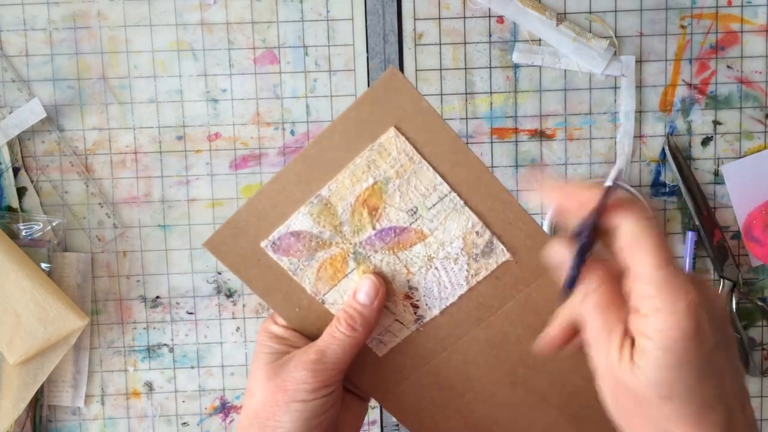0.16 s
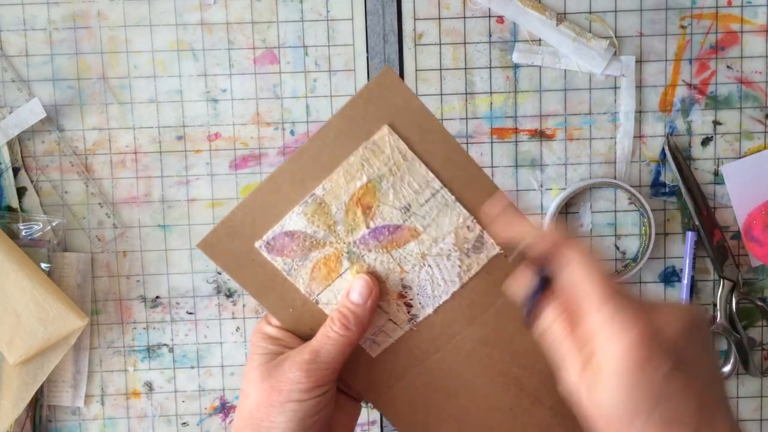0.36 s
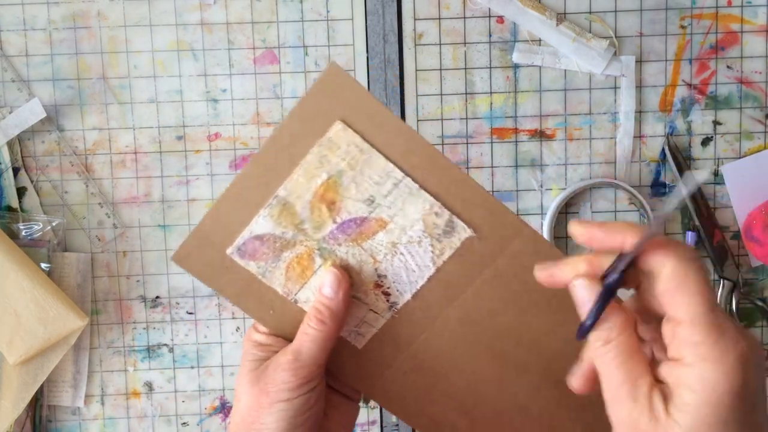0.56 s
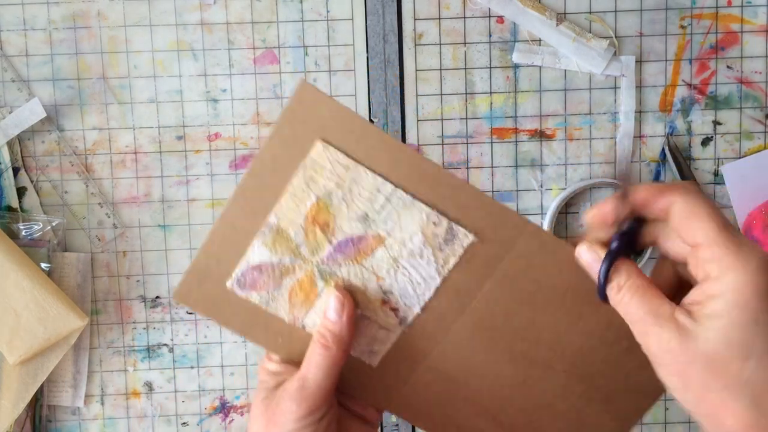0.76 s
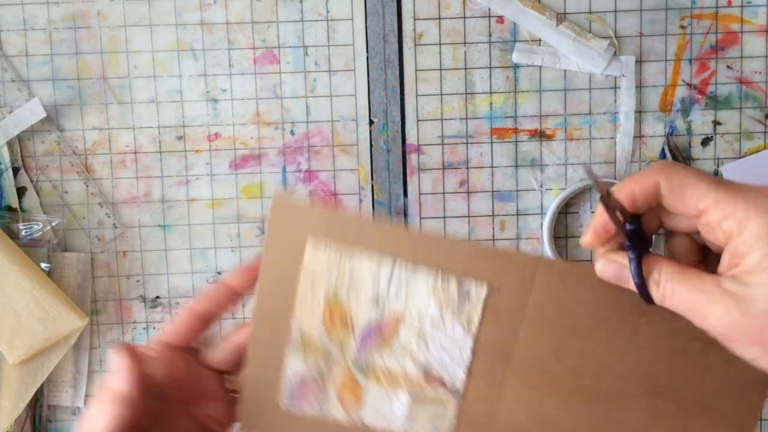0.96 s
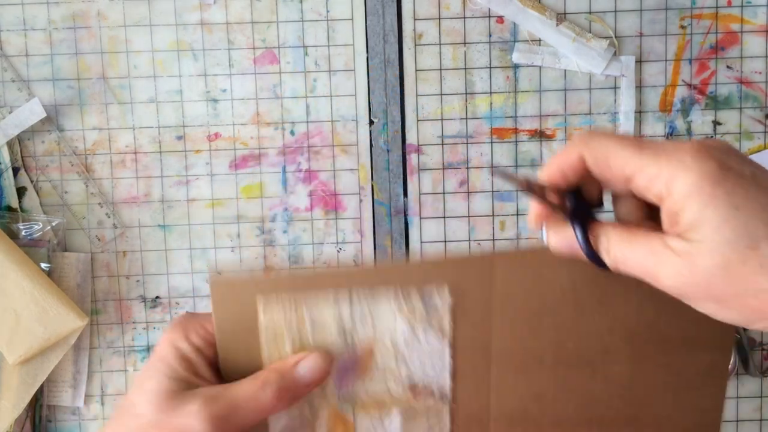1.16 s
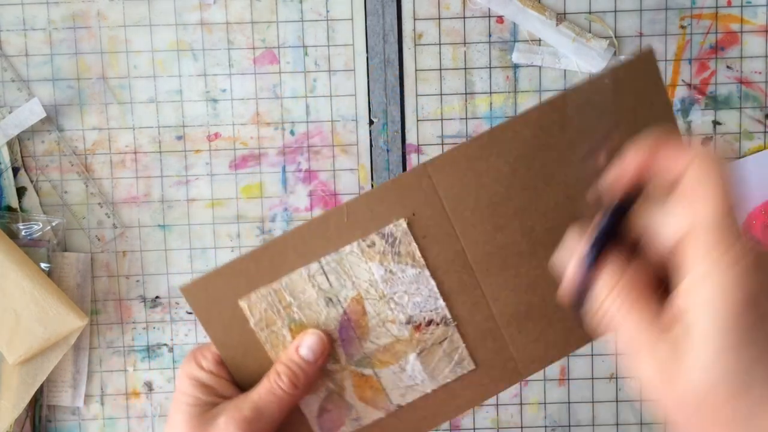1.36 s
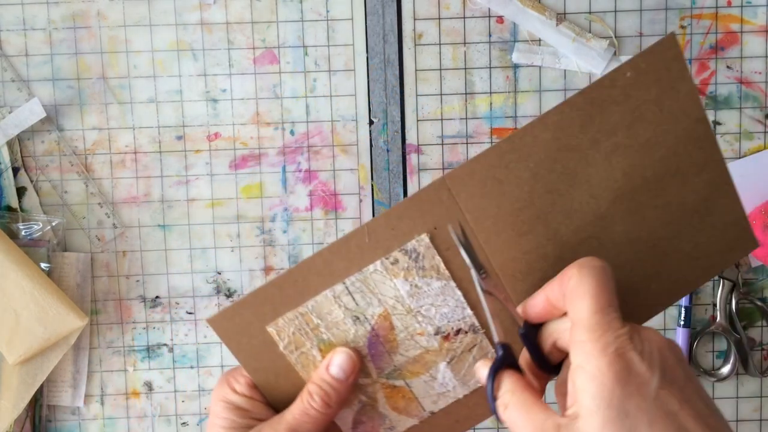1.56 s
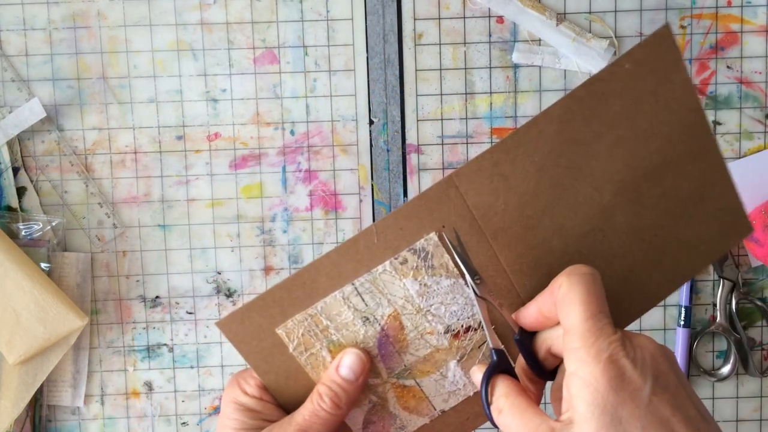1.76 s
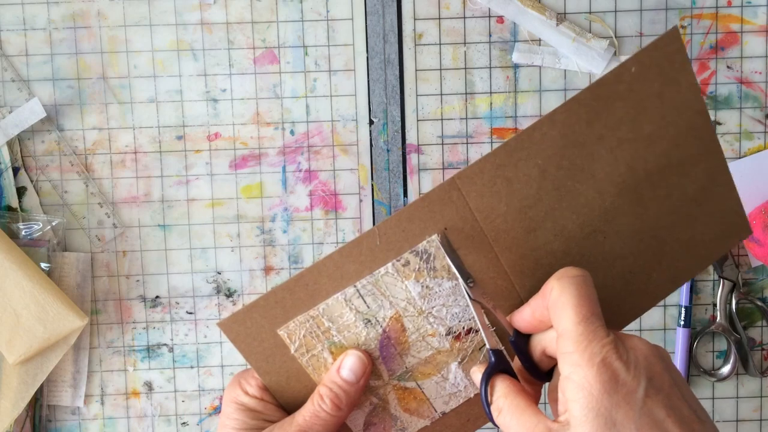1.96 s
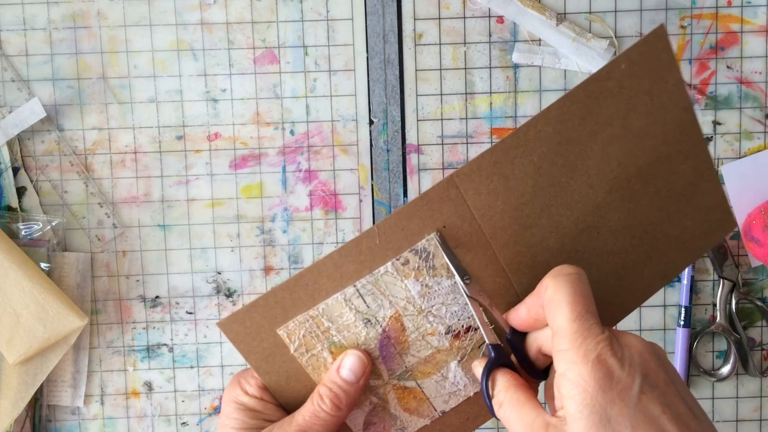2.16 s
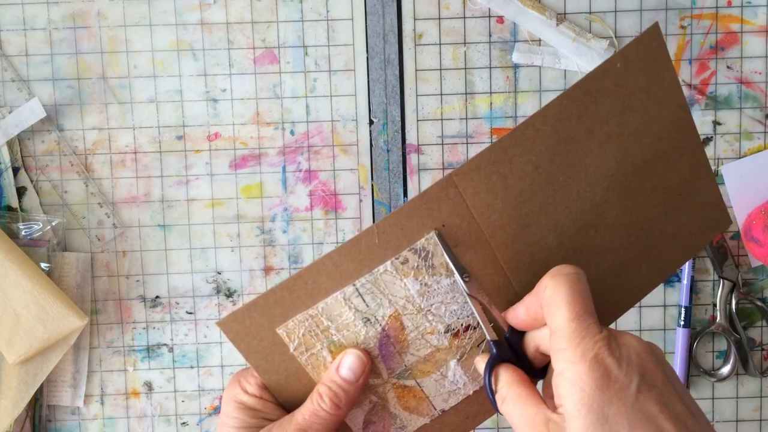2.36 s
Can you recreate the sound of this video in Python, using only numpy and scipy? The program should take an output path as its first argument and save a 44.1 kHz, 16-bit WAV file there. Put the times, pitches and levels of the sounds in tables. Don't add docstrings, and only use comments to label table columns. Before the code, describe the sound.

Two sharp scissor snips in the air, a papery card slide, a click on card, faint fabric nips

```python
import sys
import numpy as np
from scipy import signal
from scipy.fft import rfft, irfft
from scipy.io import wavfile
from scipy.ndimage import uniform_filter1d

SR = 44100
rng = np.random.default_rng(int(sys.argv[2]) if len(sys.argv) > 2 else 0)


def int16_out(signal):
    q = np.round(np.clip(np.atleast_2d(signal).T, -1, 1) * 32767)
    wavfile.write(sys.argv[1], SR, q.astype(np.int16))


def makeup_ratio(level_db):
    decades = np.asarray(level_db, float) / 20
    return 10 ** decades


N = 105840

# [s, dB, Hz, s]
STEEL_TICKS = [(0.025, -53, 9140, 0.016), (.076, -56, 7000, 0.014), (0.2394, -27.5, 7300, 0.0058),
               (0.2675, -28, 5400, 0.0098), (.2865, -35, 4550, 0.011), (0.338, -48, 6800, 0.022),
               (0.4516, -45, 7000, 0.0044), (0.4603, -31, 8140, 0.004), (.488, -30.5, 5750, 0.014),
               (0.5597, -40.5, 6300, 0.0079), (.5586, -50, 12000, 0.011), (.709, -37.5, 12500, 0.029),
               (0.713, -47, 5860, 0.017), (0.871, -47, 13000, 0.015), (1.106, -46.5, 2210, 0.033),
               (1.294, -23.5, 5160, 0.0027), (1.719, -39.5, 2230, .005)]
# [s, s, s, s, dB]
BLADE_SHEARS = [
    (.239, 0.0014, 0.02, 0.043, -38.5),
    (.285, 0.004, 0.02, 0.056, -56),
    (.4505, 0.00082, 0.02, 0.017, -56),
    (.459, 0.017, 0.013, 0.017, -42),
    (.49, 0.0071, 0.026, 0.044, -62.5),
    (1.269, 0.003, 0.028, 0.055, -49.5),
]
# [s, Hz,
# dB, s]
CARD_PINGS = [(.2385, 1278, -36.5, 0.052), (.246, 1590, -38, 0.028), (.249, 2310, -34.5, 0.052),
              (.249, 3060, -34.5, 0.032), (.2545, 7900, -34.5, 0.035), (.256, 1153, -37, .05),
              (.268, 1040, -38, .04), (.286, 1143, -32.5, 0.037), (.286, 1830, -39.5, 0.038),
              (.453, 1220, -35.5, 0.041), (.456, 986, -40, 0.041), (.470, 1700, -66, 0.031),
              (.480, 1740, -50, 0.028), (.489, 1047, -38, 0.037), (.498, 1207, -39.5, 0.036),
              (.518, 1810, -49, 0.037), (.523, 920, -46, 0.028), (1.285, 1107, -39, 0.071),
              (1.296, 2910, -36, .02), (2.247, 1112, -59.5, 0.055), (2.296, 1092, -68, .15),
              (1.732, 1210, -56, 0.037)]
# [s, Hz, dB, s]
CARD_THUMPS = [(.2388, 298, -23, 0.019), (.250, 423, -35.5, 0.14), (.262, 195, -31, 0.076),
               (.273, 182, -33, 0.074), (.2765, 483, -26.5, 0.04), (.285, 595, -33, 0.061),
               (.288, 192, -42, 0.042), (.293, 360, -29.5, 0.043), (.301, 187, -35.5, 0.11),
               (.302, 361, -49, 0.048), (.313, 248, -35, 0.023), (.322, 526, -38, 0.021),
               (.335, 174, -48, .05), (.4508, 320, -25.5, 0.025), (.455, 529, -41.5, 0.07),
               (.468, 206, -37.5, 0.053), (.482, 209, -25.5, 0.041), (.4955, 493, -24, 0.03),
               (.503, 158, -34.5, 0.086), (.510, 206, -32, 0.063), (.522, 308, -31.5, 0.037),
               (.531, 244, -37, 0.038), (.540, 162, -41.5, 0.062), (.548, 443, -49, 0.057),
               (.568, 129, -52, 0.043), (1.272, 200, -45, 0.079), (1.283, 335, -40, 0.036),
               (1.294, 300, -32.5, 0.033), (1.299, 195, -38, 0.079), (1.308, 346, -56, .05),
               (1.320, 246, -63, 0.035), (.239, 1576, -30, 0.023), (.4507, 1760, -40.5, 0.013),
               (1.7189, 1230, -33, 0.0061), (.246, 150, -43, 0.088), (.460, 148, -44.5, 0.14),
               (1.284, 111, -42.5, 0.11), (2.335, 253, -57.5, .1), (1.7185, 420, -51, 0.025),
               (1.746, 466, -53.5, 0.086), (1.765, 465, -71, .12), (1.788, 460, -57.5, 0.075)]
# [s, dB, dB, Hz]
BODY_KNOCKS = [(0.2386, -41.5, -38.5, 293), (0.4506, -41.5, -50, 330), (.460, -47, -46, 199),
               (.808, -55, -65.5, 296), (0.816, -51, -84, 151), (.842, -45.5, -49.5, 170),
               (0.956, -56.5, -62, 250), (1.2702, -56, -59, 344), (1.708, -71, -66, 398),
               (1.7238, -64, -51, 316), (2.203, -64, -65, 292), (2.25, -68, -72, 151),
               (2.339, -60, -65, 252)]
# [s, s, s, s, dB]
CARD_FLUTTERS = [
    (.240, 0.0026, 0.071, 0.065, -44.5),
    (.452, 0.001, 0.054, 0.056, -41.5),
    (.80, 0.0083, 0.069, 0.05, -59),
    (1.27, 0.018, 0.019, 0.044, -51.5),
    (1.72, 0.0011, 0.067, 0.04, -67.5),
    (2.16, 0.0085, 0.14, 0.13, -72),
    (2.29, 0.098, 0.011, 0.018, -72.5),
]
# [s, s, s, s, dB]
FABRIC_NIPS = [
    (1.722, 0.0024, 0.013, 0.075, -57.5),
    (1.74, 0.016, 0.052, 0.044, -72),
    (1.94, 0.024, 0.031, 0.07, -75),
    (2.165, 0.0089, 0.03, 0.028, -74.5),
    (2.17, 0.015, 0.11, .08, -91),
    (2.29, 0.017, 0.045, 0.031, -74.5),
]
# [s, s, s, s, dB]
FINGER_RUBS = [
    (0.89, 0.057, 0.072, 0.14, -52.5),
    (.99, 0.058, 0.022, 0.012, -52),
    (1.1345, 0.09, 0.076, 0.081, -56),
    (1.42, 0.013, 0.026, 0.064, -67.5),
    (.765, 0.0056, 0.022, .03, -69),
    (1.49, 0.026, 0.057, 0.052, -68.5),
    (0.571, 0.074, 0.038, 0.13, -63),
]
# [s, s, s, s, dB]
CARD_DRAGS = [
    (.60, 0.05, 0.017, 0.12, -64),
    (.79, 0.029, 0.17, 0.32, -63.5),
    (.835, 0.0054, 0.0063, 0.01, -55),
    (1.2, 0.059, 0.036, .06, -76),
    (1.10, 0.0034, 0.07, 0.092, -71.5),
    (1.268, 0.0034, 0.022, 0.072, -47),
    (1.44, 0.022, 0.11, 0.071, -78),
]
# [Hz, Hz, dB]
LOW_MODES = [(55.3, 23, -10), (91.5, 18.5, -8.5), (152.6, 25.2, 4.5), (227.6, 31, 6), (328, 83, 11),
             (441, 31, 11.5), (505, 23, 3), (598, 88, -2)]
# [Hz, Hz, dB]
MID_MODES = [(757, 61, -4.5), (880, 65, 0), (1108, 95, 13.5), (1247, 67, 11.5), (1586, 19, 2),
             (1797, 45, 7), (2343, 24, 5.5)]
# [Hz, Hz, dB]
STEEL_MODES = [(3220, 200, 9.5), (4630, 880, -22), (6300, 310, 3), (7500, 83, -15), (12000, 310, -5)]
# [Hz, Hz, dB]
RUBBED_MODES = [(1024, 56, 6.5), (1215, 52, 5), (1650, 64, -6), (2310, 50, -7), (3200, 120, -33),
                (5030, 140, -11), (6000, 190, -20), (11500, 670, -24)]
# [Hz, dB per Hz]
SHEAR_COLOUR = [(410, -34), (700, 3.5), (1160, 5.5), (2130, -3), (2330, -4.5), (5200, -1), (7960, -4),
                (15400, -10)]
# [Hz, dB per Hz]
NIP_COLOUR = [(350, -29), (600, -5.5), (1160, 2), (1440, -2.5), (4120, -11), (15000, -35)]
# [Hz, dB per Hz]
RUB_COLOUR = [(180, -62), (300, -3.5), (543, -9), (1020, -25), (1440, -22), (1580, 3.5), (2680, -3.5),
              (3060, 0.5), (15400, -7)]
# [Hz, dB per Hz]
DRAG_COLOUR = [(300, -3), (700, -6), (1100, -12), (1600, 1.5), (3000, -8), (6000, -11.5), (15000, -25.5)]
# [Hz, dB per Hz]
AIR_COLOUR = [(15, -4), (30, -6.5), (60, -7.5), (120, -10), (531, -14), (695, -13.5), (1130, -15),
              (1400, -18), (3250, -23), (16000, -29)]
# [s, s, Hz]
THIN_MOMENTS = [
    (.301, .029, 8200),
    (1.015, .022, 16000),
    (1.362, .022, 16000),
    (1.408, .02, 16000),
    (1.850, .022, 14000),
]


def ticks():
    out, t = np.zeros(N), np.arange(1500) / SR
    for start_s, level_db, hz, t60_s in STEEL_TICKS:
        snap = 9.3 * (t == 0)
        burst = (rng.standard_normal(len(t)) + snap) * makeup_ratio(-60 * t / t60_s)
        band = [0.34 * hz, min(1.54 * hz, 0.45 * SR)]
        crack = signal.lfilter(*signal.butter(2, band, "band", fs=SR), burst)
        swell = np.minimum(t / 0.0013, 1)
        tone = np.sin(2 * np.pi * hz * t) * makeup_ratio(-11 - 60 * t / (t60_s + 0.0034)) * swell
        add(out, start_s, makeup_ratio(level_db) * (crack / abs(crack).max() + tone))
    return out


def shears():
    scrape = grit(per_s=6400.0, spread_db=-2.5, smooth=0.93) * wobble(ms=3.5, depth_db=1.6)
    blades = makeup_ratio(-26) * through(scrape, STEEL_MODES)
    return strokes(BLADE_SHEARS) * evened(coloured(scrape, SHEAR_COLOUR) + blades)


def rings(rows, rise_cycles):
    out, t = np.zeros(N), np.arange(6000) / SR
    for start_s, hz, peak_db, t60_s in rows:
        swell = 1 - np.exp(-t * hz / rise_cycles)
        add(out, start_s, -makeup_ratio(peak_db - 60 * t / t60_s) * swell * np.sin(2 * np.pi * hz * t))
    return out


def knocks():
    contact_s, favour_oct, grip_damping = 0.0016, 0.32, 1.93
    spread_db, mid_trim_db = -0.5, -6.5
    low, mid = np.zeros(N), np.zeros(N)
    for start_s, low_db, mid_db, pitch_hz in BODY_KNOCKS:
        favoured = []
        for hz, width_hz, db in LOW_MODES:
            octaves_off = np.log2(hz / pitch_hz)
            favoured.append((hz, width_hz * grip_damping, db - 6 * (octaves_off / favour_oct) ** 2))
        add(low, start_s, -makeup_ratio(low_db) * ring(favoured, spread_db, sign=-1.044))
        add(mid, start_s, makeup_ratio(mid_db + mid_trim_db) * ring(MID_MODES, spread_db, sign=-0.88))
    t = np.arange(200) / SR
    blow = np.exp(-0.5 * ((t - 0.5 * contact_s) / (0.13 * contact_s)) ** 2)
    return signal.oaconvolve(low, blow / blow.sum())[:N] + mid


def flutter():
    pushes = grit(per_s=280.0, spread_db=2.5, smooth=0.4)
    body = through(pushes, LOW_MODES) + makeup_ratio(-19) * through(pushes, MID_MODES)
    return strokes(CARD_FLUTTERS) * evened(body)


def rubbing(pressure, colour, body, body_db):
    friction = grit(per_s=5100.0, spread_db=-1.5, smooth=0.78) * wobble(ms=5.5, depth_db=0.8)
    hiss = coloured(friction, colour)
    return pressure * patchy(hiss + makeup_ratio(body_db) * through(friction, body))


def room(x):
    t60_s = 0.18
    t = np.arange(SR // 3) / SR
    echoes = rng.choice([-1, 1], len(t)) * (rng.random(len(t)) < 0.05)
    taps = echoes * makeup_ratio(-60 * t / t60_s) * (t > 0.004)
    taps = signal.lfilter([0.5], [1, -0.5], taps)
    return signal.oaconvolve(x, taps / np.linalg.norm(taps))[:N]


def air():
    hush = coloured(rng.standard_normal(N), AIR_COLOUR)
    bass = signal.lfilter(*signal.butter(2, 400, fs=SR), hush)
    return makeup_ratio(-72) * (hush + bass * wobble(ms=27.0, depth_db=5.0))


def evened(x):
    return x / np.sqrt(np.mean(x ** 2) + 1e-20)


def coloured(x, points):
    f, db = np.transpose(points)
    hz = np.fft.rfftfreq(len(x), 1 / SR)
    gain = makeup_ratio(np.interp(np.log(hz + 1), np.log(f + 1), db))
    return evened(irfft(rfft(x) * gain, len(x)))


def ring(modes, spread_db=0., sign=1):
    t = np.arange(4096) / SR
    out = np.zeros(len(t))
    for k, (hz, width_hz, db) in enumerate(modes):
        level = sign ** k * makeup_ratio(db + spread_db * rng.standard_normal())
        out += level * np.exp(-np.pi * width_hz * t) * np.sin(2 * np.pi * hz * t)
    return out


def through(x, modes):
    return evened(signal.oaconvolve(x, ring(modes, sign=-0.75))[:N])


def grit(per_s, spread_db, smooth):
    sizes = makeup_ratio(spread_db * np.minimum(rng.exponential(1, N), 4))
    clicks = sizes * rng.choice([-1, 1], N) * (rng.random(N) < per_s / SR)
    return evened(clicks) + smooth * rng.standard_normal(N)


def wobble(ms, depth_db):
    n = max(int(ms * SR / 1000), 2)
    drift = uniform_filter1d(uniform_filter1d(rng.standard_normal(N), n), n)
    return makeup_ratio(depth_db * evened(drift))


def patchy(x):
    z = signal.stft(x, nperseg=256)[2]
    field = uniform_filter1d(rng.standard_normal(z.shape), size=5, axis=0)
    field = evened(uniform_filter1d(field, size=8, axis=1))
    return evened(signal.istft(z * makeup_ratio(1.8 * field), nperseg=256)[1][:N])


def strokes(rows):
    t = np.arange(N) / SR
    out = np.zeros(N)
    for start_s, rise_s, hold_s, fall_s, level_db in rows:
        rise = np.clip((t - start_s) / rise_s, 0, 1) ** 2
        falling_s = np.maximum(t - start_s - rise_s - hold_s, 0)
        out += makeup_ratio(level_db - 30 * falling_s / fall_s) * rise
    return out


def add(mix, start_s, sound):
    part = mix[round(start_s * SR):][:len(sound)]
    part += sound[:len(part)]


def thin_treble(x):
    t = np.arange(N) / SR
    hz, at, z = signal.stft(x, SR, nperseg=1024, noverlap=768)
    tall = abs(z) > 1.75 * uniform_filter1d(abs(z), size=15, axis=1)
    for start_s, length_s, top_hz in THIN_MOMENTS:
        middle = np.argmin(abs(at - start_s - length_s / 2))
        lines = tall[0, :, middle] & (hz < top_hz) & (hz >= 1900)
        gain = (hz < 1900) + 2.2 * lines
        thin = signal.istft(z * gain[:, None], SR, nperseg=1024, noverlap=768)[1][:, :N]
        share = np.clip(np.minimum(t - start_s, start_s + length_s - t) / 0.004 + 0.5, 0, 1)
        x = x + share * (thin - x)
    return x


def scene():
    scissors = ticks() + shears() + rings(CARD_PINGS, rise_cycles=2.1)
    card = rings(CARD_THUMPS, rise_cycles=0.23) + knocks() + flutter()
    fabric = rubbing(strokes(FABRIC_NIPS), NIP_COLOUR, MID_MODES, body_db=-13)
    fingers = rubbing(strokes(FINGER_RUBS), RUB_COLOUR, RUBBED_MODES, body_db=-9.5)
    drag = rubbing(strokes(CARD_DRAGS), DRAG_COLOUR, RUBBED_MODES[:4], body_db=-4)
    near = scissors + card + fabric + fingers + drag
    return (near + makeup_ratio(-25) * room(near) + air())[None]


def top_cut(x):
    return signal.sosfilt(signal.butter(12, 16510, fs=SR, output="sos"), x)


def record(dry):
    x = signal.sosfilt(signal.butter(3, 45, "high", fs=SR, output="sos"), dry)
    band_edge = signal.firwin(255, 15750, window=("kaiser", 4), fs=SR)
    x = signal.oaconvolve(x, band_edge[None], "same")
    finished = thin_treble(x)
    return top_cut(finished)


dry = scene()
out = record(dry)
int16_out(out)
```